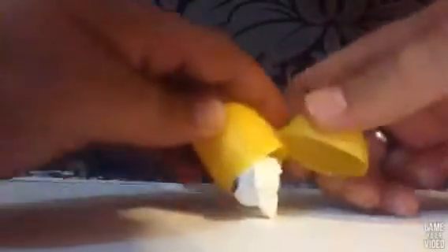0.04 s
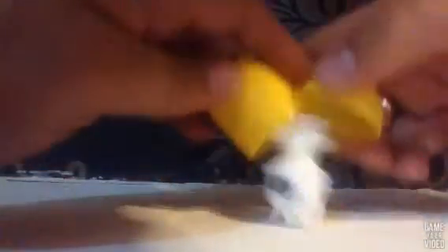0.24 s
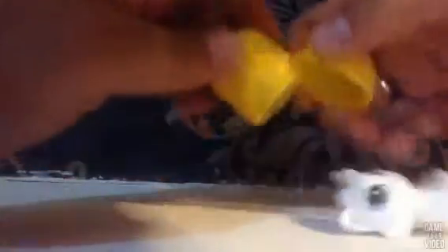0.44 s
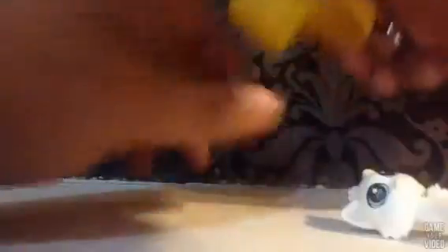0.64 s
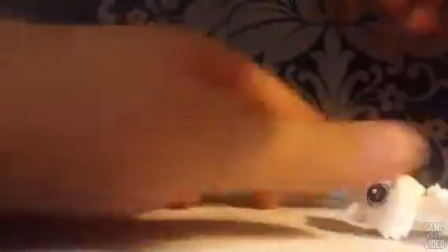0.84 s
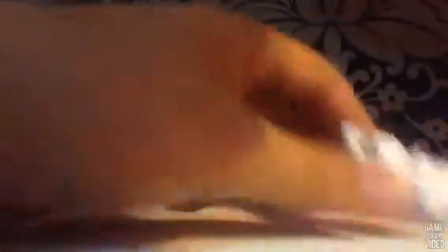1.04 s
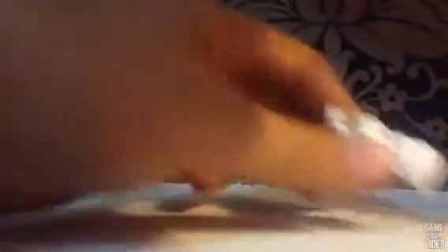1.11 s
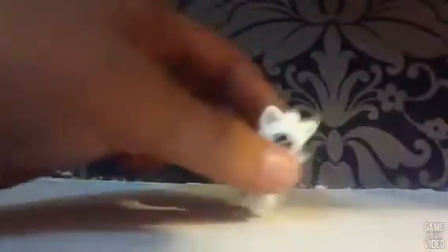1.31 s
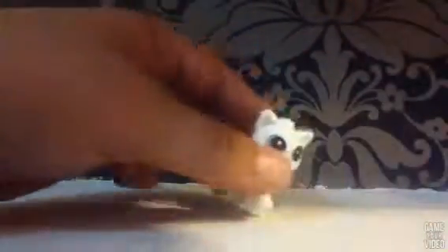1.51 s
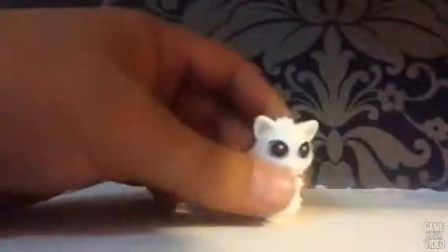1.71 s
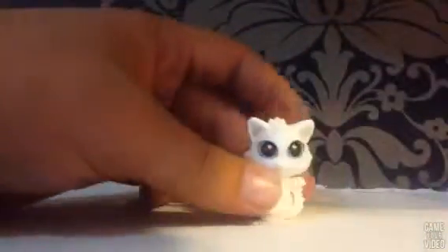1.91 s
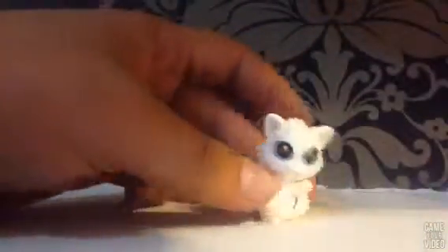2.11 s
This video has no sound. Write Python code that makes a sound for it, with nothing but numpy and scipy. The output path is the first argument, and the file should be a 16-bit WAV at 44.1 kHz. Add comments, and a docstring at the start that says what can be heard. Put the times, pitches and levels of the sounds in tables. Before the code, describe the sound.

A small hard plastic toy hits a wooden table at about 0.25 seconds, then bounces and tumbles with quick knocks and bright clicks until 0.5. Near 0.9 seconds fingers drag it back with light taps, a grainy scuff and a faint rustle. From 1.3 to 2.1 seconds it is set down in several softer, duller knocks. Quiet room hum, microphone hiss and low rumble lie underneath.

```python
"""Over a quiet room hum, microphone hiss and low rumble, a small hard plastic toy drops out of a capsule.
It hits a light wooden table at 0.25 s, then bounces and tumbles: the knocks ring the table top,
and the toy's hard edges add bright clicks. Next, fingers drag it back with a grainy scuff
and a faint rustle. Last, they set it down in a few softer, duller knocks."""
import sys
import numpy as np
from scipy import signal
from scipy.fft import rfft, irfft, next_fast_len
from scipy.io import wavfile
from scipy.ndimage import map_coordinates

SR = 44100
rng = np.random.default_rng(int(sys.argv[2]) if len(sys.argv) > 2 else 0)


def to_wav(s):
    """Save 16-bit WAV."""
    ch = np.atleast_2d(s).T  # columns
    pcm = np.round(np.clip(ch, -1, 1) * 32767)  # PCM
    wavfile.write(sys.argv[1], SR, pcm.astype(np.int16))


N = 94815


def amp(db):
    return 10 ** (np.asarray(db) / 20)

def unit_rms(x):
    return x / np.sqrt(np.mean(x ** 2) + 1e-20)

def curve_at(points, hz):
    """Read a curve of (f/Hz, value) points on a log frequency axis."""
    freqs, values = np.transpose(points)
    return np.interp(np.log(hz + 1), np.log(freqs + 1), values)

def fader(points):
    """Gain per sample from (t/s, level/dB) points, silent outside them."""
    times, db = np.transpose(points)
    return amp(np.interp(np.arange(N) / SR, times, db, -120, -120))

def eq(x, response):
    """Filter x by a complex frequency response."""
    size = next_fast_len(len(x) + 8192)
    return irfft(rfft(x, size) * response(np.fft.rfftfreq(size, 1 / SR)), size)[:len(x)]

def noise(colour, count=N):
    """Noise of rms 1, shaped by (f/Hz, level/dB) points."""
    return unit_rms(eq(rng.standard_normal(count), lambda hz: amp(curve_at(colour, hz))))

def wobble(rate):
    """A smooth random modulator, rate knots a second."""
    knots = rng.standard_normal(int(N * rate / SR) + 4)
    return map_coordinates(knots, [np.arange(N) * rate / SR])

def ring(modes, t, spread_db=2.5):
    """Decaying sine modes, balanced a little differently on every hit."""
    return sum(-amp(db + rng.normal(0, spread_db) - 60 * t / t60) * np.sin(2 * np.pi * hz * t)
               for hz, db, t60 in modes)


# The table top's main modes: f/Hz, level/dB, t60/s
WOOD_MODES = [(173.7, -10, 0.17), (245.7, -1.5, 0.18), (303.3, 0.5, 0.1), (349.4, -7.5, 0.12),
              (396, -6, 0.075), (450.7, -4.5, 0.057), (538, -5.5, 0.08), (623, -9.5, 0.096),
              (680.6, -18, 0.11), (708.3, -6.5, .07), (882, -6, .06), (944, -10, 0.083), (1189, -9, 0.078),
              (1394, -13, 0.18)]
# Its many small modes, as a noise colour: f/Hz, level/dB
WOOD_COLOUR = [(150, -26.5), (250, -5.5), (300, -2), (645, -9), (914, -10.5), (1740, -26), (2050, -23),
               (7000, -70.5), (9100, -69), (15400, -120)]
# Toy and finger hits: t/s, level/dB, softness/low-pass poles, thinness/high-pass poles,
# ring length/factor, f/Hz favoured by the struck spot
KNOCKS = [(0.094, -30, 1.64, 0.3, 1.3, 530), (0.111, -22.5, 2.16, 0.3, 1.1, 630),
          (.125, -27.5, 1.3, 0.69, 0.63, 300), (0.171, -32.5, 1.05, .6, 0.63, 524),
          (0.2478, -1.5, 1.54, 0.071, 0.81, 276), (0.3211, -4.5, 0.41, .2, 0.68, 355),
          (0.3334, -9, 1.6, 0.31, 0.94, 286), (0.3438, -2.5, 0.43, 0.29, 0.7, 890),
          (0.373, -10.5, .8, 0.14, 0.83, 304.3), (.388, -10, 0.5, 0.26, 0.67, 950),
          (.405, -10.5, 0.68, 0.17, 0.85, 915), (.422, -19.5, 0.4, 0.35, 1.1, 703),
          (.442, -29, 1.2, 0.34, 0.45, 417), (0.484, -28.5, 3, 0.2, 1.3, 457),
          (0.5057, -23, 0.8, 0.42, 1.1, 800), (0.7165, -17, 2.03, 0.05, 0.43, 300),
          (.913, -25, 0.47, 1.2, 2.4, 920), (0.9229, -15, 0.91, 0.27, 0.58, 280),
          (.929, -23.5, 1.26, 0.45, .9, 940), (1.316, -11.5, 1.05, 0.71, 1.42, 682),
          (1.327, -11, 0.95, 1.06, 0.72, 469), (1.519, -24.5, 2.1, 0.54, 1.56, 304),
          (1.532, -25.5, 2, 0.32, 0.78, 531), (1.5839, -15.5, 1.1, 0.95, 1.06, 320),
          (1.601, -13, 2.7, 1.1, 1.63, 387), (1.627, -14.5, 2.4, 1.07, 0.38, 315.4),
          (1.669, -30, 2.5, 0.26, 0.74, 521), (1.7952, -27, 0.26, 2.3, 0.8, 1400),
          (1.8033, -10.5, 1.09, 0.37, 0.66, 479), (1.807, -22, 0.84, .9, .8, 920),
          (1.813, -17, 1.2, .4, 0.87, 310), (1.844, -20, 1.9, 0.44, 0.61, 430),
          (1.868, -28, 2, 0.53, 0.74, 460), (1.924, -22, 2.3, .5, 1, 359),
          (1.98, -29.5, 2.67, .5, 1.2, 306), (2.003, -24.5, 3.9, 0.4, 1.1, 472),
          (2.096, -40.5, 2.5, 0.31, 0.46, 620), (2.136, -23.5, 2.1, 0.47, 1.8, 574)]

def table_knocks():
    """Each hit rings the top; soft ones are duller and start slower, a resting hand shortens the ring."""
    soft_hz, thin_hz, bass_hz = 528, 357, 169
    spot_boost_db, spot_width_oct = 7.5, 0.26
    attack_s, wash_t60_s = 0.00014, 0.076
    out, t = np.zeros(N + SR), np.arange(SR // 4) / SR
    for start, db, softness, thinness, length, spot_hz in KNOCKS:
        wash = noise(WOOD_COLOUR, len(t)) * amp(-6 - 60 * t / wash_t60_s)
        boost = lambda hz: spot_boost_db * np.exp(-(np.log2(hz / spot_hz) / spot_width_oct) ** 2)
        modes = [(hz, mode_db + boost(hz), t60 * length) for hz, mode_db, t60 in WOOD_MODES]
        attack = 1 - np.exp(-t / (attack_s * (1 + softness)))
        knock = (amp(-7) * ring(modes, t) + wash) * attack
        high_cut = lambda hz: (1 + 1j * hz / soft_hz) ** -softness
        low_cut = lambda hz: (1j * (hz + 1) / (thin_hz + 1j * hz)) ** thinness
        out[round(start * SR):][:len(t)] += amp(db) * eq(knock, lambda hz: high_cut(hz) * low_cut(hz))
    return eq(out[:N], lambda hz: (1j * hz / (bass_hz + 1j * hz)) ** 4)  # the top radiates little bass


# The plastic toy's modes: f/Hz, level/dB, t60/s
TOY_MODES = [(2160, 0, .012), (2990, -2.5, 0.012), (3790, -1, 0.017), (3980, -5.5, .015),
             (5050, -2.5, 0.018), (5710, -5.5, 0.008), (10150, -4, .016), (12240, -8.5, .01)]
# Colour of the click's transient: f/Hz, level/dB
CRACK_COLOUR = [(900, -17.5), (1500, 2.5), (2050, -3), (2700, -8), (3800, -15), (5200, -20.5), (8000, -28),
                (10500, -27.5), (13000, -28.5), (15200, -36.5), (16300, -57.5)]
# Edge hits: t/s, level/dB, tilt/(dB per octave) around 5 kHz, crack t60/s
CLICKS = [(0.1251, -46.5, -4, 0.066), (0.1685, -45.5, -6, 0.038), (0.2484, -29, 1.2, 0.043),
          (0.3213, -21.5, -9, 0.048), (0.3333, -34, 5, 0.018), (0.3429, -6, 0.2, 0.025),
          (0.3744, -17, 3, 0.012), (0.3894, -15, 1.8, 0.018), (0.4057, -24.5, -1, .03),
          (0.5065, -35.5, -3.5, 0.047), (.913, -52.5, 6.5, 0.029), (0.9304, -39, 8.5, 0.018),
          (.959, -46, 3, 0.039), (0.99, -45.5, 1.5, .021), (1.316, -30.5, -3, 0.064),
          (1.321, -34, 3.5, 0.011), (1.5818, -46, -2.5, 0.087), (1.7945, -49, -1, 0.054),
          (1.8055, -59, -8, 0.031)]

def toy_clicks():
    """A hard edge strikes: a short crack of noise with the toy's own ring tucked under it."""
    out, t = np.zeros(N + SR), np.arange(SR // 10) / SR
    attack = 1 - np.exp(-t / 0.00069)
    for start, db, tilt_db, crack_t60 in CLICKS:
        tilt = lambda hz: tilt_db * np.log2(min(hz, 10500) / 5000)  # levels off in the top treble
        colour = [(hz, band_db + tilt(hz)) for hz, band_db in CRACK_COLOUR]
        crack = noise(colour, len(t)) * amp(-60 * t / crack_t60)
        plastic = ring([(hz, mode_db + tilt(hz), t60) for hz, mode_db, t60 in TOY_MODES], t)
        out[round(start * SR):][:len(t)] += amp(db) * (crack + amp(-15) * plastic) * attack
    return out[:N]


# Slides on the top: peak t/s, level/dB, time to swell by 30 dB/s, t60/s
SCUFFS = [(0.116, -43.5, 0.062, 0.14), (.41, -33.5, .02, 0.37), (0.927, -29, 0.034, 0.24),
          (1.33, -41, 0.013, 0.1), (1.608, -34, 0.017, 0.067), (1.819, -44.5, 0.013, 0.25),
          (1.94, -47.5, 0.034, 0.19)]

def table_scuffs():
    """Toy and fingers slide on the top: grainy, wood-coloured noise that swells and dies."""
    t = np.arange(N) / SR
    swell = sum(amp(db - 60 * np.where(t < peak, (peak - t) / (2 * rise), (t - peak) / t60))
                for peak, db, rise, t60 in SCUFFS)
    grain = amp(3.5 * wobble(150))
    return swell * unit_rms(grain * noise(WOOD_COLOUR))


# The room's decay times: f/Hz, t60/s
ROOM_DECAY = [(200, 0.46), (2000, 0.25), (10000, 0.28)]

def room_reverb(x, wet_db=-19.5, predelay_samples=300):
    """The room answers with a short tail in which each frequency dies at its own speed."""
    hz, t, spectrum = signal.stft(rng.standard_normal(SR // 2), SR, nperseg=256)
    decay = amp(-60 * t / curve_at(ROOM_DECAY, hz)[:, None])
    tail = signal.istft(spectrum * decay, SR, nperseg=256)[1]
    delayed = np.pad(x, (predelay_samples, 0))
    return amp(wet_db) * signal.fftconvolve(delayed, tail / np.linalg.norm(tail))[:N]


# Fader ride of the hum: t/s, level/dB
HUM_RIDE = [(0.0, -50), (0.16, -50.5), (0.34, -43), (0.42, -58), (0.54, -49), (0.75, -49.5), (1.27, -51),
            (1.79, -46.5), (1.89, -51.5), (2.15, -48.5)]
# Its broad colour: f/Hz, level/dB
HUM_COLOUR = [(60, -42.5), (110, -7), (220, -9), (500, -8), (1000, -15), (1500, -24.5), (3000, -38.5),
              (7000, -44.5), (9000, -76)]
# Its resonances: f/Hz, width/Hz, relative level/dB
HUM_PEAKS = [(238, 45, -1), (293.5, 46, -8.5), (518, 32, 3), (607, 69, -4), (842, 20, -4), (922, 17, -6.5),
             (1355, 140, -6)]

def room_hum(boost_db=13.5):
    """The room hums in the table: wavering noise lifted at a few resonances."""
    peaks = lambda hz: 1 + sum(amp(db + boost_db) / (1 + 4 * ((hz - centre) / width) ** 2)
                               for centre, width, db in HUM_PEAKS)
    hum = unit_rms(eq(noise(HUM_COLOUR), peaks))
    return hum * fader(HUM_RIDE) * amp(1.8 * wobble(25))


# Fader ride of the rustle: t/s, level/dB
RUSTLE_RIDE = [(0.0, -66.5), (0.24, -83), (0.34, -86), (0.51, -72.5), (1.19, -69), (1.37, -73),
               (1.55, -81.5), (2.15, -81)]
# Its colour: f/Hz, level/dB
RUSTLE_COLOUR = [(880, -26), (1500, -2), (1980, -3), (2220, -8.5), (4790, -12.5), (9000, -24),
                 (11700, -47.5), (19800, -120)]

def hand_rustle():
    """Moving hands make a faint upper-mid noise with a slight flutter."""
    return noise(RUSTLE_COLOUR) * fader(RUSTLE_RIDE) * amp(0.5 * wobble(27))


# Colour of the hiss: f/Hz, level/dB
HISS_COLOUR = [(3000, -27.5), (6200, -9.5), (11700, -5.5), (14200, 0.5), (14900, -1), (15350, 4),
               (15500, -33), (16400, -39.5)]
# Fader ride of the rumble: t/s, level/dB
RUMBLE_RIDE = [(0, -55.5), (.2, -68), (.28, -66), (.34, -46), (.45, -73), (.9, -68), (.96, -55),
               (1.12, -61.5), (1.2, -64.5), (1.45, -77.5), (1.6, -67), (2.15, -69.5)]
# Its colour: f/Hz, level/dB
RUMBLE_COLOUR = [(12, -38), (20, -13), (53, 6.5), (76, -23), (130, -18.5), (170, -44), (290, -120)]

def noise_floor():
    """Steady, airy microphone hiss over a low rumble that comes and goes."""
    hiss = amp(-75.5) * noise(HISS_COLOUR)
    rumble = noise(RUMBLE_COLOUR) * fader(RUMBLE_RIDE)
    return hiss + rumble


def scene():
    """Mono mix: the contacts up front, their reverb, and the background bed."""
    contacts = table_knocks() + toy_clicks() + table_scuffs()
    return (contacts + room_reverb(contacts) + room_hum() + hand_rustle() + noise_floor())[None]

def record(dry):
    """Soft-clip the loudest peaks, then cut everything above the band limit."""
    ceiling, top_hz = 0.98, 16400
    rounded = dry[0] / (1 + np.abs(dry[0] / ceiling) ** 6) ** (1 / 6)
    return eq(rounded, lambda hz: hz < top_hz)[None]


dry = scene()
out = record(dry)
to_wav(out)
```